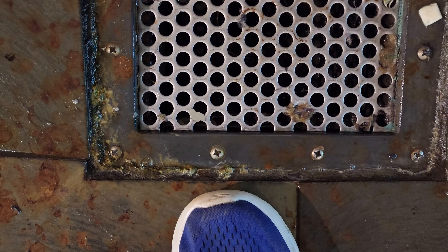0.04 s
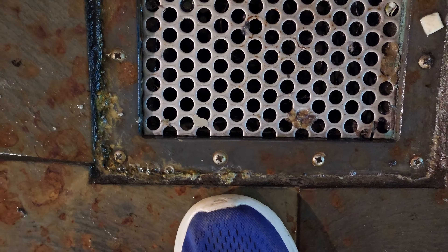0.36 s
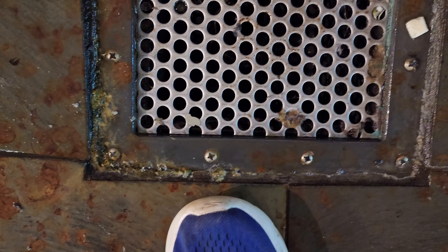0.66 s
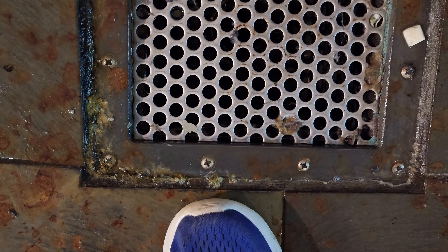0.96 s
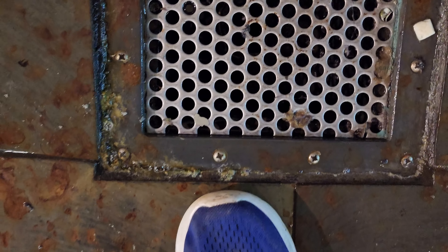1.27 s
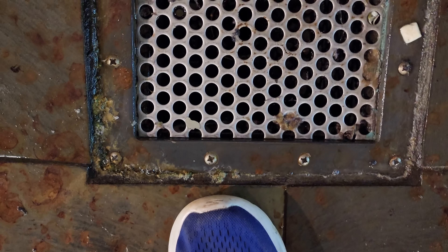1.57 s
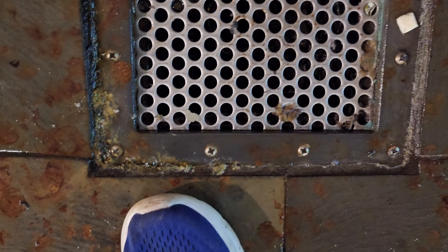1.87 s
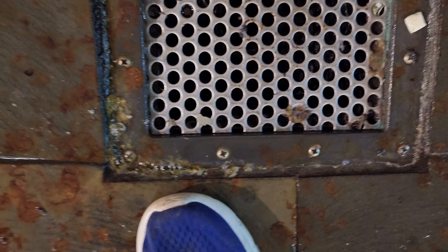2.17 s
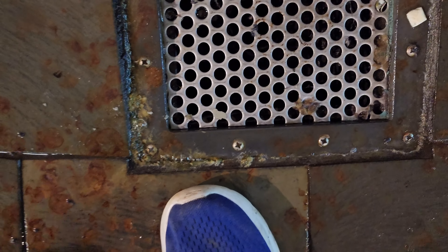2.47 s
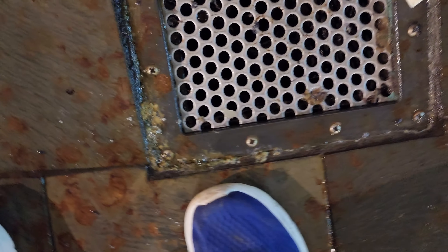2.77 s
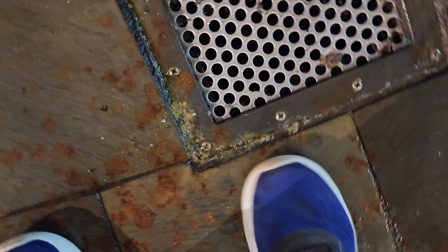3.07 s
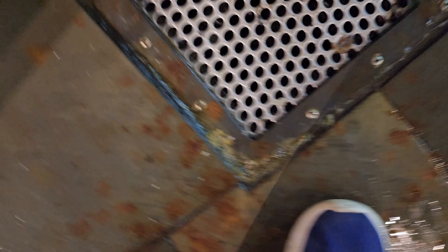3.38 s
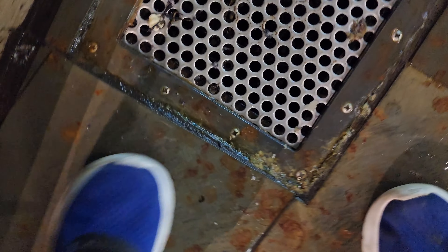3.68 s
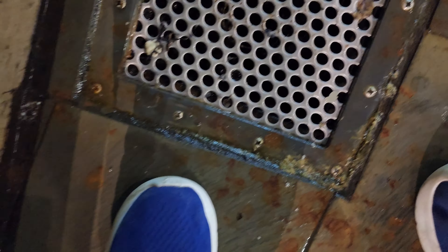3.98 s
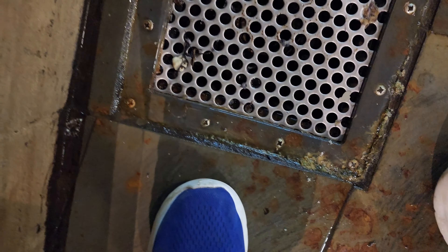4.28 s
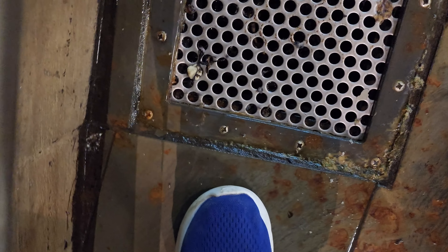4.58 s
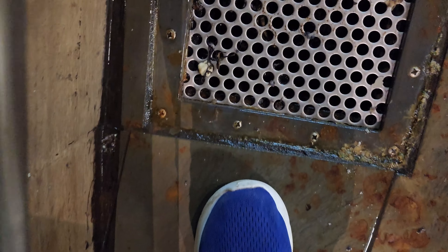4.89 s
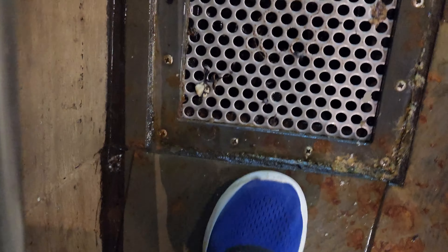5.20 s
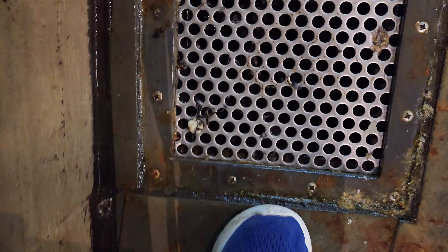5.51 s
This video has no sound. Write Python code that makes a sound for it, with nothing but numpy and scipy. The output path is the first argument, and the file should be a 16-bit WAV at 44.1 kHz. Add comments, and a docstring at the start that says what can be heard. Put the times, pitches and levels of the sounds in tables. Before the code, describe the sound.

A shoe sole scrubs back and forth on gritty slate, with small taps and one knock over a low ventilation rumble.

```python
"""A hissing scrub comes from the left: a sole rubs to and fro on rough slate, three strokes a second,
with one pause. Its friction noise is the sum of countless tiny slips and grows with sliding speed.
Grit catches and crunches, feet tap and shift, and one shoe is set down with a knock; the impacts
ring as damped vibrations. Ventilation rumble and mains hum fill the small, hard room."""
import sys
import numpy as np
from scipy import signal
from scipy.fft import rfft, irfft, next_fast_len
from scipy.io import wavfile
from scipy.ndimage import map_coordinates

SR = 44100
rng = np.random.default_rng(int(sys.argv[2]) if len(sys.argv) > 2 else 0)


def dump(signal):
    """Clip the signal to [-1, 1] and save it as 16-bit WAV at the path in sys.argv[1]."""
    limited = np.clip(np.atleast_2d(signal).T, -1, 1)
    pcm = np.round(limited * 32767).astype(np.int16)
    wavfile.write(sys.argv[1], SR, pcm)


N = 249165

# Strokes of the sole. Each row: start in seconds, length in seconds, share spent speeding up,
# relative peak levels of hiss, rasp and fizz in dB.
STROKE_PLAN = [(-0.163, 0.31, .53, -36, -46, -46), (.187, 0.29, 0.5, -32.5, -45, -41.5),
               (0.491, 0.3, 0.54, -35.5, -47, -46), (.823, 0.29, 0.56, -31.5, -44.5, -42),
               (1.107, .332, 0.64, -35, -44.6, -48), (1.497, 0.28, .33, -33, -46, -42.5),
               (1.783, 0.31, .66, -37.1, -47.5, -46.5), (2.94, 0.35, 0.76, -32.5, -45.5, -42.5),
               (3.288, 0.38, 0.38, -32.3, -45, -42.5), (3.693, 0.27, 0.43, -32, -44, -38.6),
               (3.937, 0.38, .52, -36, -44.5, -45.5), (4.332, 0.32, 0.57, -30, -43, -38.5),
               (4.631, 0.47, .5, -36.2, -43, -43.5), (5.124, .327, 0.66, -32.5, -42, -37.5),
               (5.445, 0.33, .37, -34.5, -42, -42.5)]
# The slow slide between strokes drags out, rests and sets off again.
# Each row: time in seconds, relative levels of hiss and rasp in dB.
SLOW_SLIDE = [(1.8, -47.7, -51), (2.1, -40, -52), (2.313, -45.5, -57.5), (2.551, -49.5, -57),
              (2.599, -59.4, -61), (2.7, -58.5, -61.5), (2.734, -47.3, -51.5), (2.93, -42.5, -58),
              (3.29, -47.9, -47)]
# Friction spectra. Each row: frequency in Hz, relative spectral density in dB.
HISS_SPECTRUM = [(2500, -33), (3300, -13.5), (4300, -7.5), (4900, -2), (5450, -0.5), (6300, 0),
                 (6900, -3.5), (7500, -5.5), (8000, -15.5), (8700, -24), (10500, -48)]  # fine grain
RASP_SPECTRUM = [(300, -9), (600, -11), (950, -8.5), (1400, -4.5), (1750, -4), (2200, -1), (3200, 3),
                 (4200, -2), (5500, -1.5), (7500, -20), (9000, -39)]  # coarse grain
FIZZ_SPECTRUM = [(4500, -27), (6000, -0.5), (8000, -3), (8800, -3.5), (9900, -3), (11000, -0.5),
                 (11700, 2.5), (13200, -2), (15700, -2.5)]  # the treble of fast strokes
SOLE_SPECTRUM = [(1800, -37), (2300, -11), (2750, -37), (4500, -34), (5200, -8), (5580, -1), (6000, -14),
                 (7000, -29)]  # the sole's two resonances
CRUNCH_SPECTRUM = [(200, -21), (450, 3), (800, 2), (1500, 1), (2500, -6), (5000, -32)]  # crushed grit
# Grit catching. Each row: start in seconds, tick level in dB, scrape level in dB, T60 in seconds.
GRIT_CATCHES = [(0.322, -26, -34, 0.044), (0.659, -30, -34, 0.13), (0.921, -26, -35, 0.042),
                (1.286, -40, -40, .02), (2.732, -40.5, -39, 0.1), (3.1194, -29, -47, .02),
                (3.2784, -45, -35, 0.016), (3.368, -47, -34, .03), (3.5048, -33, -37, 0.26),
                (3.569, -36.5, -33.5, 0.024), (3.806, -28.5, -29, 0.12), (4.0902, -39, -36.5, 0.21),
                (4.245, -45, -36.5, 0.25)]
# Taps of feet and pebbles. Each row: start in seconds, relative level in dB, pitch in Hz,
# left minus right in dB, T60 in seconds.
STONE_TAPS = [(0.323, -22.5, 470, 7, 0.024), (0.659, -30, 620, 9, 0.053), (0.9225, -25, 423, 3, 0.041),
              (1.57, -35, 402, 0, 0.039), (1.862, -37, 420, 1, 0.079), (1.921, -30, 710, 3, 0.05),
              (1.942, -35, 795, 1.5, 0.038), (2.061, -33.5, 570, 5, 0.041), (2.771, -34, 3000, 4, 0.02),
              (3.016, -37, 398, 3, .06), (3.2099, -22, 800, 1, 0.022), (3.278, -39.5, 450, -1, .05),
              (3.412, -32, 786, -3.5, 0.041), (3.464, -38, 674, 3, 0.069), (3.508, -37, 543, -1, .08),
              (4.484, -27.5, 390, 2, 0.06), (5.119, -37.5, 533, 1.5, 0.074), (5.158, -38, 487, 0, 0.072),
              (5.241, -31.5, 594, 5, 0.043), (5.334, -33, 261, -1, 0.12)]
# A foot turning on grit. Each row: start in seconds, length in seconds, peak level in dB.
FOOT_TURNS = [(3.135, 0.12, -44), (3.265, 0.072, -47), (3.33, 0.3, -52.5)]
# A shoe lands with a sharp knock, then a low thump.
# Each row: start in seconds, relative levels of knock and thud in dB, thud pitch in Hz.
SHOE_IMPACTS = [(3.805, -16.5, -11.5, 133), (3.827, -41, -14.5, 98)]
# Modes of the struck tile. Each row: frequency in Hz, relative level in dB, T60 in seconds.
TILE_MODES = [(200, -9, 0.08), (368, -15, 0.069), (465, -7.5, 0.071), (613, -1.5, 0.059),
              (702, -9.5, 0.055), (927, -16, 0.066), (1253, -19, 0.068), (1630, -15, 0.039),
              (1920, -11.5, 0.036)]
# Ventilation spectra. Each row: frequency in Hz, relative spectral density in dB.
DUCT_SPECTRUM = [(15, -14), (25, -16), (40, -8), (62, -1), (75, -2), (97, 1.5), (112, -1), (130, -3),
                 (148, -5), (180, -8.5), (220, -16), (300, -20), (450, -19.5), (900, -32), (2000, -100)]
AIR_SPECTRUM = [(400, -1.5), (530, 2.5), (615, -2.5), (690, 7), (800, -1.5), (1500, -1), (2000, 0.5),
                (2300, -3.5), (3000, -29), (5000, -17), (7000, -14), (9000, -51), (15000, -44)]
# Mains and fan tones. Each row: frequency in Hz, level in dB.
HUM_TONES = [(120, -45.5), (240, -60), (288, -64.5)]
# Coherence of the room noise. Each row: frequency in Hz, left-right correlation from 0 to 1.
COHERENCE = [(60, 0.99), (130, 0.98), (290, 0.85), (640, 0.61), (1200, 0), (3000, 0)]
# Reverberation time. Each row: frequency in Hz, T60 in seconds.
ROOM_T60 = [(150, 0.13), (1000, 0.8), (5000, 0.17), (14000, 0.061)]
# The microphone's body shades its right port. Each row: frequency in Hz, left minus right in dB.
PORT_SHADOW = [(500, 3.5), (1300, 5.5), (2200, 5.5), (3300, 5.5), (4300, 3.5), (5500, 13.5), (6400, 14.5),
               (7500, 17), (8200, 17), (9500, 14), (11400, 7), (12500, 8.5), (15000, 4)]
# The microphone turns, so its right port gets more fizz.
# Each row: time in seconds, extra left minus right in dB.
FIZZ_BALANCE = [(3.6, 1.2), (4.1, -2), (5.3, -1.5)]


def scrub(resonance_growth=0.51):
    """Sliding friction: fine grain hisses, coarse grain rasps; fast strokes fizz, slow ones resonate."""
    hiss_db, rasp_db, fizz_db = friction_levels()
    effort_db = hiss_db + 35.5  # relative to an ordinary stroke
    resonance_db = np.minimum(resonance_growth * effort_db - 45.5, hiss_db - 6)
    judder_db = 0.32 * wobble(35) + 0.41 * wobble(150)  # the rubber grips unevenly
    hiss = amp(hiss_db - 0.34) * from_left(slips(30000, spread_db=1.0, common=0.29), HISS_SPECTRUM)
    fizz_gain = amp(fizz_db) * pan(curves(FIZZ_BALANCE)[0])
    fizz = fizz_gain * from_left(slips(30000, spread_db=1.5, common=0.3), FIZZ_SPECTRUM)
    resonance = amp(resonance_db) * from_left(rng.standard_normal((2, N)), SOLE_SPECTRUM)
    rasp_gain = amp(rasp_db + 2.0 + 0.87 * wobble(18))
    rasp = rasp_gain * from_left(slips(5000, spread_db=0.5, common=0.7), RASP_SPECTRUM)
    return early_reflections(amp(judder_db - 0.78) * (hiss + fizz + resonance + rasp))


def friction_levels(exponents=(0.69, 0.57, 0.87)):
    """Power law: hiss, rasp and fizz grow with speed and add in power to the slow slide. Returns dB."""
    hiss_db, rasp_db = curves(SLOW_SLIDE)
    fizz_db = 1.606 * hiss_db + 16.0  # fizz dies faster than hiss as the sole slows
    power = amp([hiss_db, rasp_db, fizz_db]) ** 2
    for start, length, rise, *peaks_db in STROKE_PLAN:
        speed = stroke_speed(start, length, rise)
        power += [(amp(db) * speed ** exponent) ** 2 for db, exponent in zip(peaks_db, exponents)]
    return 10 * np.log10(power)


def stroke_speed(start, length, rise):
    """A skewed half sine: speed climbs from rest to 1 over the share `rise`, then returns to rest."""
    progress = np.interp(np.arange(N) / SR, [start, start + length * rise, start + length], [0, 0.5, 1])
    return np.sin(np.pi * progress).clip(0)


def slips(per_second, spread_db, common):
    """Shot noise: random slips of unequal size over the stone's grain, partly common to both channels."""
    happens = rng.random(N) < per_second / SR
    size = amp(spread_db * np.clip(rng.standard_normal(N), -2, 2))
    return unit_rms(happens * size * (rng.standard_normal((2, N)) + common * rng.standard_normal(N)))


def grit_catches():
    """Stick and slip: a grain bites, then skids in a decaying burst of noise."""
    out, t = np.zeros((2, N)), np.arange(SR // 5) / SR
    for start, tick_db, scrape_db, t60 in GRIT_CATCHES:
        tick = amp(tick_db) * from_left(rng.standard_normal((2, len(t))), HISS_SPECTRUM)
        scrape = amp(scrape_db) * from_left(rng.standard_normal((2, len(t))), RASP_SPECTRUM)
        add(out, start, decay(t, t60) * (tick + scrape))
    return out


def taps(q=1.37, attack_s=0.00053):
    """Damped oscillation: each tap on stone rings one note inside a broad noise band of the same pitch."""
    out, t = np.zeros((2, N)), np.arange(SR // 5) / SR
    for start, db, pitch, pan_db, t60 in STONE_TAPS:
        band = lambda hz: 1 / (1 + (q * (hz / pitch - pitch / (hz + 1))) ** 2)
        noise = rng.standard_normal(len(t)) + 0.94 * rng.standard_normal((2, len(t)))
        puff = amp(-6.0) * unit_rms(filtered(noise, band))
        note = amp(-4.5) * np.sin(2 * np.pi * pitch * t)
        envelope = decay(t, t60) * (1 - np.exp(-t / attack_s))
        add(out, start, amp(db) * pan(pan_db) * (note + puff) * envelope)
    return out


def foot_turns():
    """Brittle fracture: coarse grains crush one by one under a turning foot."""
    envelope = sum(amp(db) * stroke_speed(start, length, rise=0.47) for start, length, db in FOOT_TURNS)
    return envelope * from_left(slips(1200, spread_db=5, common=0.62), CRUNCH_SPECTRUM)


def footstep(crack_hz=3000, attack_s=0.00093):
    """Impact excitation: the shoe cracks on the tile and rings its modes; the weight behind it thuds."""
    out, t = np.zeros((2, N)), np.arange(SR // 3) / SR
    lowpass = lambda hz: 1 / (1 + (hz / crack_hz) ** 4)
    for start, knock_db, thud_db, thud_hz in SHOE_IMPACTS:
        ring = np.zeros((2, len(t)))
        for k, (hz, db, t60) in enumerate(TILE_MODES):
            gain = (-1) ** k * amp(db + rng.normal(size=(2, 1)))
            ring += gain * decay(t, t60) * np.sin(2 * np.pi * hz * t)
        crack = unit_rms(filtered(rng.standard_normal((2, len(t))), lowpass))
        knock = ring + amp(-6.5) * crack * decay(t, t60=0.022)
        thud = np.sin(2 * np.pi * thud_hz * t) * decay(t, t60=0.046) * (1 - np.exp(-t / attack_s))
        add(out, start, amp(knock_db) * pan(4.3) * knock + amp(thud_db) * thud)
    return out


def from_left(x, spectrum, echo_gain=0.016, echo_s=0.001044, right_lag_s=0.00047):
    """Acoustic shadow: x, given a spectrum and a faint echo, is weaker and later on the right. RMS 1."""
    def response(hz):
        comb = 1 - echo_gain * np.exp(-2j * np.pi * hz * echo_s)
        delay = np.exp(-2j * np.pi * hz * np.array([[0], [right_lag_s]]))
        return amp(log_interp(spectrum, hz)) * comb * pan(log_interp(PORT_SHADOW, hz)) * delay
    return unit_rms(filtered(x, response))


def early_reflections(x, gain=0.42, count=6):
    """Interference: floor and wall echoes thicken the grains; their pattern drifts as the sole moves."""
    t = np.arange(SR // 16) / SR
    patterns = rng.standard_normal((count, 2, len(t))) * decay(t, t60=0.05) * (t > 0.002)
    echoes = signal.oaconvolve(x[None], patterns / np.linalg.norm(patterns[0, 0]), axes=2)[..., :N]
    blend = np.array([wobble(16) for _ in range(count)])
    blend /= np.linalg.norm(blend, axis=0)
    return x + gain * np.sum(echoes * blend[:, None], axis=0)


def reverberation(x):
    """Repeated reflection off hard walls: the midrange lingers, while treble and bass die sooner."""
    hz, t, spectra = signal.stft(rng.standard_normal((2, SR // 2)), SR, nperseg=256)
    absorption = amp(-60 * t / log_interp(ROOM_T60, hz)[:, None])
    _, tail = signal.istft(spectra * absorption, SR, nperseg=256)
    return signal.fftconvolve(x, tail / np.linalg.norm(tail[0]), axes=1)[:, :N]


def ventilation(rumble_db=-39, air_db=-56.5):
    """Flow noise and tones: duct rumble and faint moving air, with a slightly unsteady hum."""
    t = np.arange(N) / SR
    hum = np.zeros(N)
    for hz, db in HUM_TONES:
        gain = amp(db + 0.67 * wobble(3.28))
        hum += gain * np.sin(2 * np.pi * hz * t + 0.16 * wobble(1.79))
    return amp(rumble_db) * diffuse_noise(DUCT_SPECTRUM) + hum + amp(air_db) * diffuse_noise(AIR_SPECTRUM)


def diffuse_noise(spectrum):
    """A diffuse field: noise of RMS 1, coherent between the channels only at long wavelengths."""
    def response(hz):
        angle = np.arccos(log_interp(COHERENCE, hz)) / 2
        return amp(log_interp(spectrum, hz)) * [np.cos(angle), np.sin(angle)]
    mid, side = filtered(rng.standard_normal((2, N)), response)
    return unit_rms(np.array([mid + side, mid - side]))


def amp(db):
    """Amplitude ratio of a level in dB."""
    return 10 ** (np.asarray(db) / 20)


def unit_rms(x):
    """Normalisation to RMS 1."""
    return x / np.sqrt(np.mean(x ** 2) + 1e-20)


def log_interp(points, hz):
    """Interpolation of (Hz, value) points on a logarithmic frequency axis."""
    frequencies, values = np.transpose(points)
    return np.interp(np.log(hz + 1), np.log(frequencies + 1), values)


def curves(rows):
    """Linear interpolation in time of each later column; the end values hold."""
    times, *columns = np.transpose(rows)
    return [np.interp(np.arange(N) / SR, times, column) for column in columns]


def wobble(rate):
    """Random modulation: a smooth curve through `rate` knots a second."""
    return map_coordinates(rng.standard_normal(int(N * rate / SR) + 4), [np.arange(N) * rate / SR])


def filtered(x, response):
    """Linear filtering: the spectrum of x times a frequency response."""
    n = x.shape[-1]
    padded = next_fast_len(n + 8192)
    return irfft(rfft(x, padded) * response(np.fft.rfftfreq(padded, 1 / SR)), padded)[..., :n]


def decay(t, t60):
    """Exponential decay by 60 dB in t60 seconds."""
    return np.exp(-np.log(1000) * t / t60)


def pan(db):
    """Constant-power gains for a left-minus-right level difference."""
    ratio = amp(np.atleast_1d(db))
    return np.array([ratio, np.ones_like(ratio)]) * np.sqrt(2 / (1 + ratio ** 2))


def add(track, start_s, sound):
    """Superposition of a sound on the track."""
    start = round(start_s * SR)
    track[:, start:start + sound.shape[-1]] += sound[..., :N - start]


def scene():
    """Superposition of scrubbing, footwork with its reverberation, and ventilation."""
    footwork = grit_catches() + taps() + foot_turns() + footstep()
    return scrub() + footwork + amp(-18.5) * reverberation(footwork) + ventilation()


def record(dry):
    """Band limiting: nothing above 15.8 kHz passes."""
    return filtered(dry, lambda hz: hz < 15800)


dry = scene()
out = record(dry)
dump(out)
```